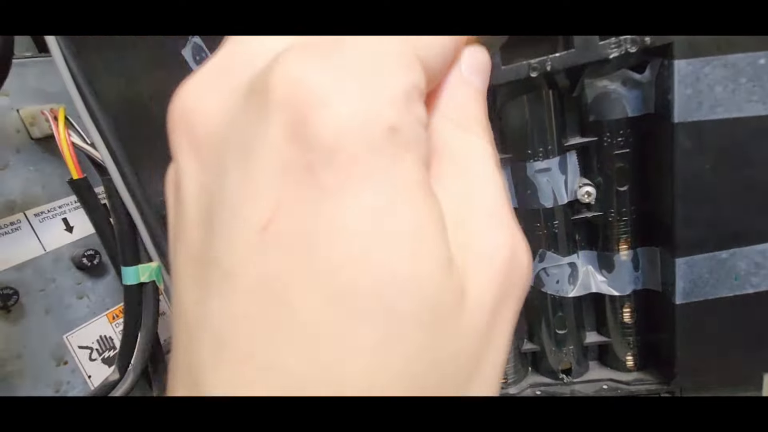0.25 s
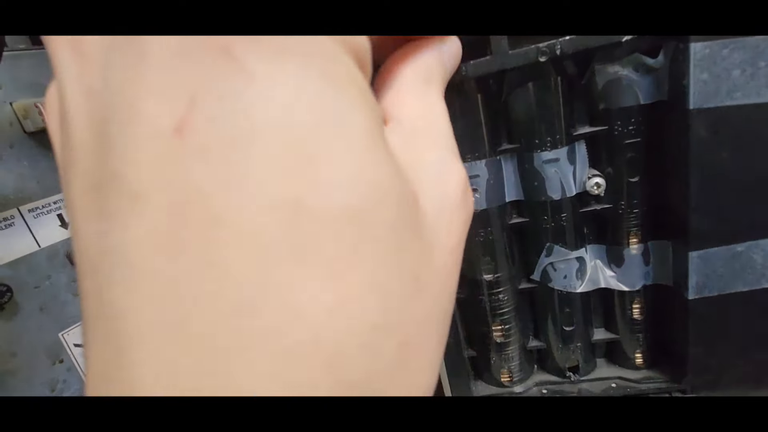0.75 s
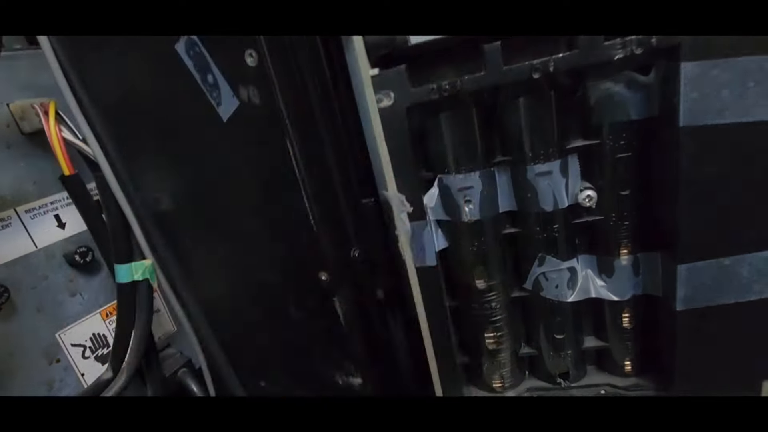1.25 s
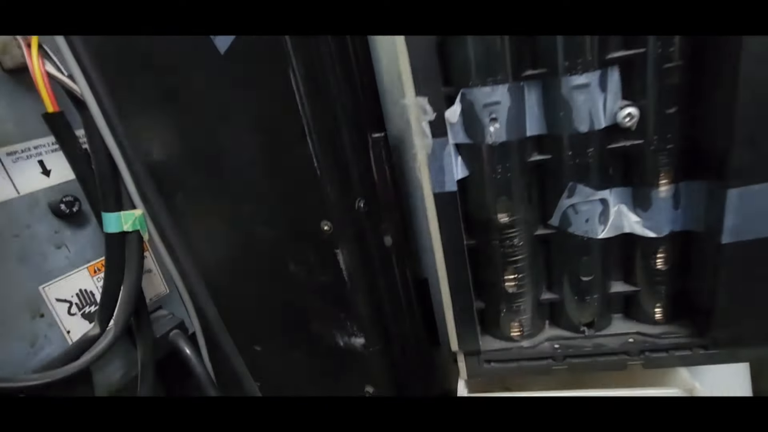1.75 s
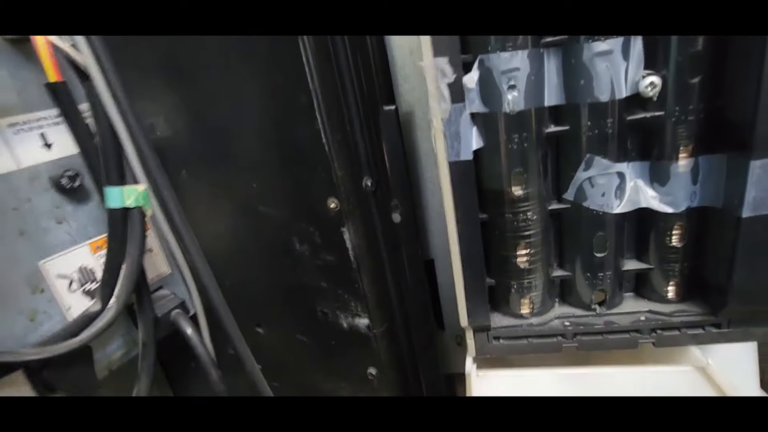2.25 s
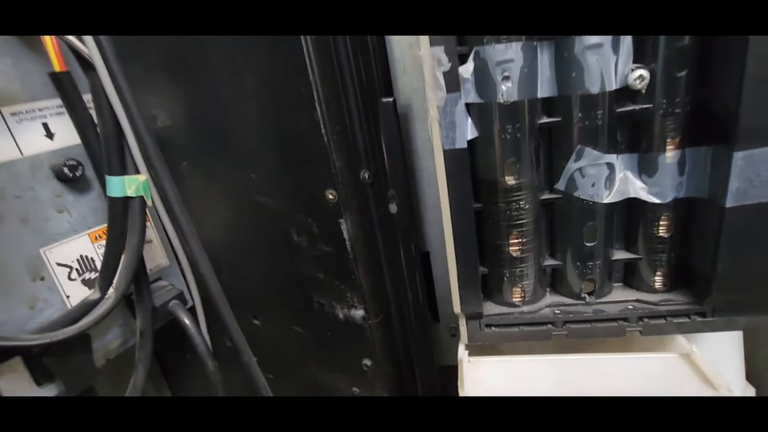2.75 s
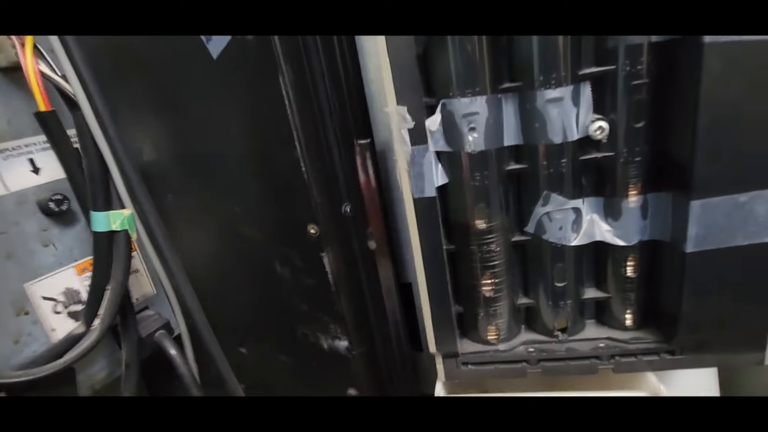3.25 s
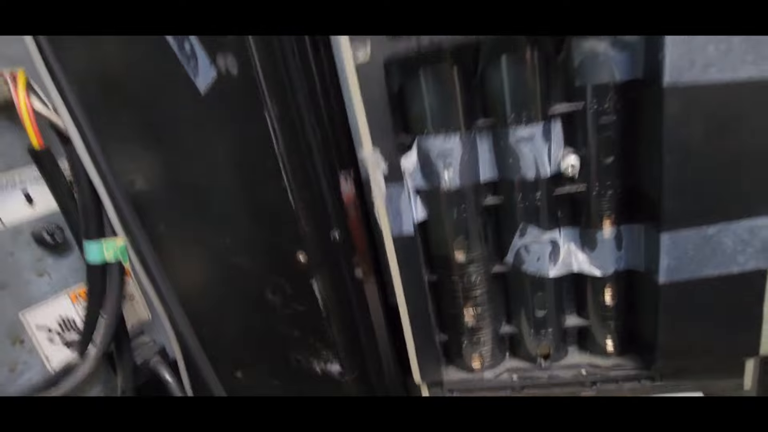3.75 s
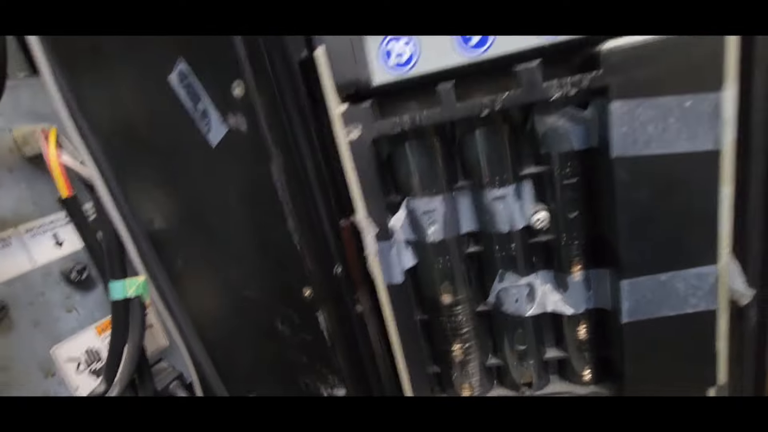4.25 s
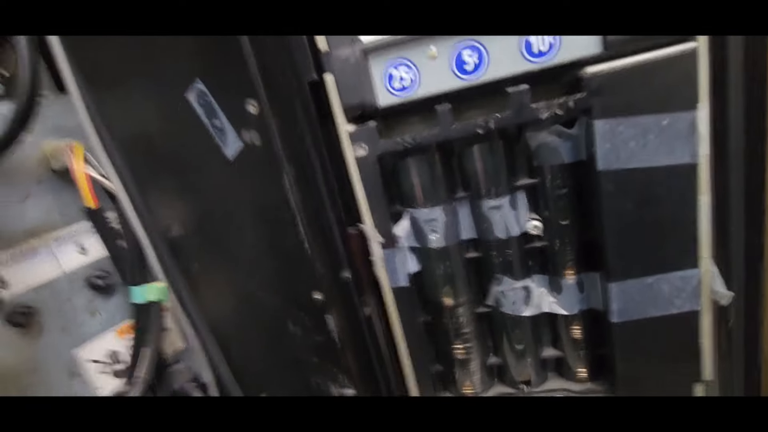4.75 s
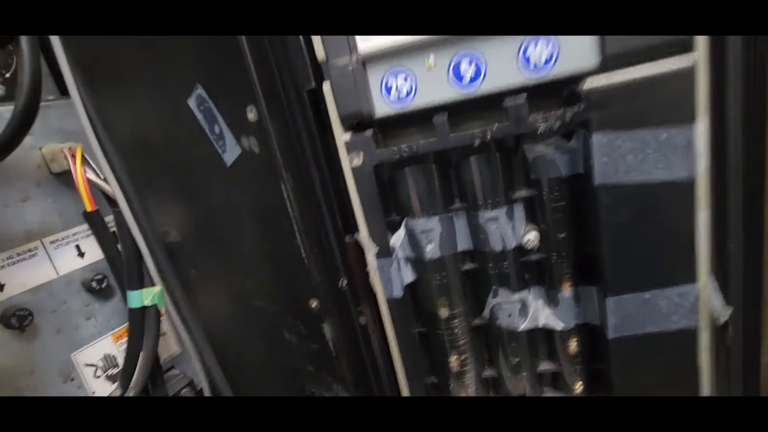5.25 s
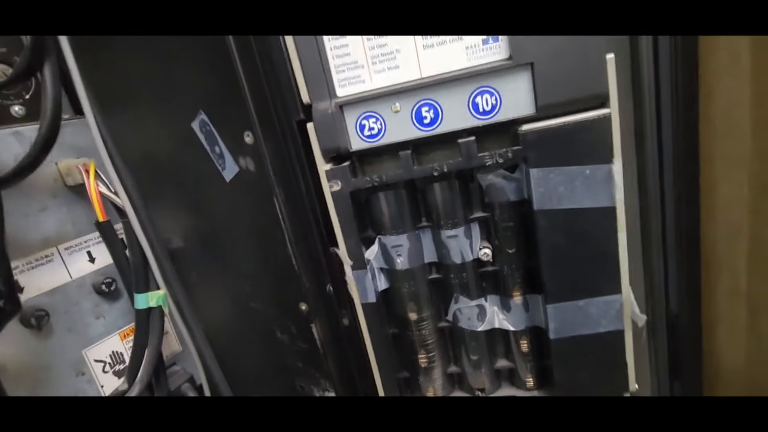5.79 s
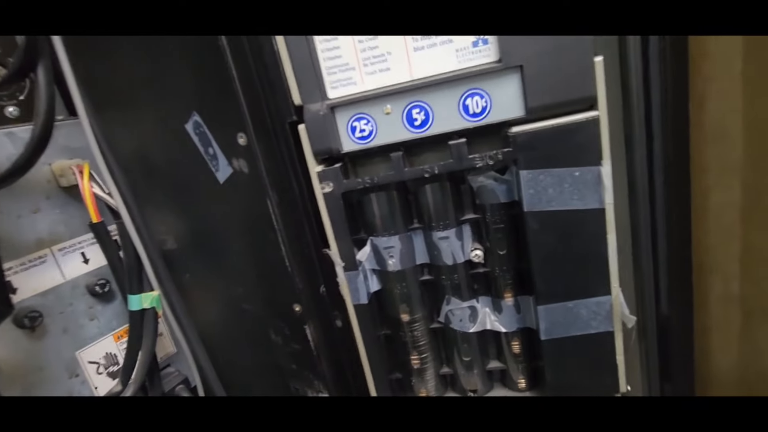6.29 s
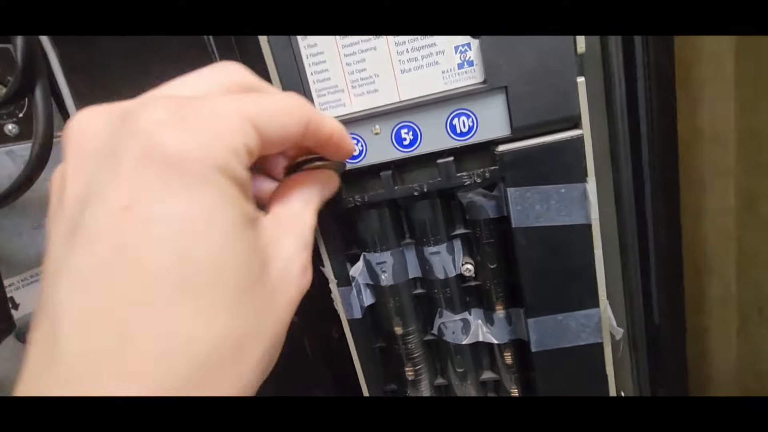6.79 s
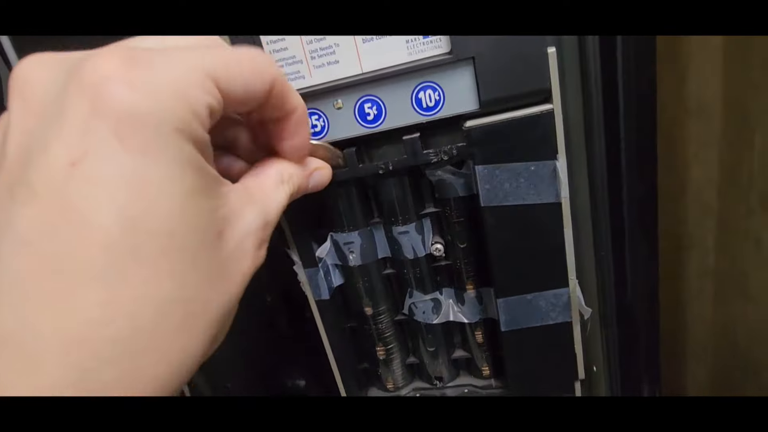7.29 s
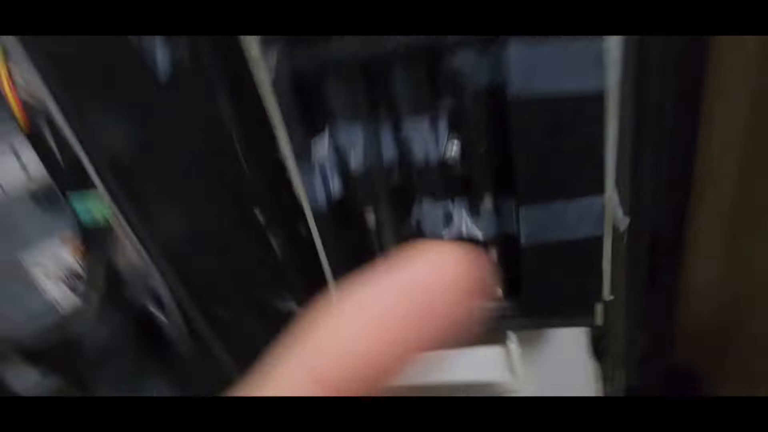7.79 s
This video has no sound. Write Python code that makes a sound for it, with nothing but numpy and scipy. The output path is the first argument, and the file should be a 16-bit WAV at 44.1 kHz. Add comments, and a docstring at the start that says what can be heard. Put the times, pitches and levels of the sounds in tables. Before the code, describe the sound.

Close, bright coin clinks and hollow plastic knocks come in two bursts, with thin palm jingling between them and a low fan hum throughout.

```python
"""Coins clink, knock and slide down the plastic chute of a coin changer for about a second, close by.
From 2.7 s they jingle in a palm and roll between fingers; from 6.8 s they knock and slide in the chute again.
A cooling unit hums throughout: fan blades, airflow in the cabinet and the faint whine of its compressor.
Rings and pings are fading sine tones, the chute adds panel tones, and snaps and rubs are shaped noise."""
import sys
import numpy as np
from scipy import signal
from scipy.fft import rfft, irfft, next_fast_len
from scipy.io import wavfile
from scipy.ndimage import map_coordinates

SR = 44100
rng = np.random.default_rng(int(sys.argv[2]) if len(sys.argv) > 2 else 0)


def wav_out(sig):
    """Save sig, one row per channel (or a flat mono array), as 16-bit PCM at SR to the path in sys.argv[1]."""
    wavfile.write(sys.argv[1], SR, np.round(np.clip(np.atleast_2d(sig).T, -1, 1) * 32767).astype(np.int16))


N = 354123

# A t60 is the time in which a sound fades by 60 dB.
# coin on coin: start_s, ring_db, ring_hz, lower_mode_db, bright_crack_db, dull_crack_db, ping_hz, ring_t60_s
COIN_CONTACTS = [(0.0194, -28, 15500, -45, -34, -41, 4270, 0.1),
                 (0.0344, -33, 15400, -38, -37, -33, 4470, 0.1),
                 (0.072, -13, 15100, -24, -28, -29.5, 3900, 0.12),
                 (0.097, -21, 15100, -18.5, -32, -44, 4620, 0.1),
                 (0.1458, -10, 15100, -31, -17.5, -21.5, 4960, 0.12),
                 (0.1666, -12, 15500, -24.5, -31, -42, 4450, 0.14),
                 (0.2129, -24, 15300, -46, -32, -40, 5130, 0.092),
                 (0.2558, -8, 15000, -31, -23, -24, 5380, 0.12),
                 (0.2674, -5, 15100, -20, -27, -27, 5570, 0.11),
                 (0.2952, -8, 15000, -39, -30, -38, 5820, 0.08),
                 (0.3306, -33, 15100, -41, -35, -45, 4950, 0.1),
                 (0.4036, -41, 15300, -30, -34, -22, 4640, 0.14),
                 (0.439, -7, 15500, -37, -22, -14, 5070, 0.081),
                 (0.4626, -24, 15200, -43, -43, -27, 4560, 0.11),
                 (0.5203, -35, 15300, -39, -47, -46, 4260, 0.17),
                 (0.569, -7, 15200, -32, -18, -20, 5580, 0.082),
                 (0.6138, -14, 15200, -30, -28, -22, 4760, 0.087),
                 (0.6214, -19, 15400, -32, -30, -22.5, 4580, 0.14),
                 (0.6724, -17, 15300, -42, -30, -40, 5630, 0.08),
                 (0.826, -42, 15300, -45, -39, -26, 4600, 0.1),
                 (0.8872, -48, 15300, -49, -41, -29, 4470, 0.1),
                 (0.9138, -37, 15300, -52, -49, -40, 4500, 0.082),
                 (0.9258, -38, 15300, -42, -39, -27, 4600, 0.053),
                 (0.9414, -38, 15500, -40, -28.5, -19.5, 4640, 0.09),
                 (0.9524, -42, 15600, -44, -49, -37, 5020, 0.1),
                 (0.9644, -44, 15300, -45, -44, -37, 5080, 0.1),
                 (1.0346, -33, 15000, -41, -43, -40, 4680, 0.1),
                 (1.056, -11, 15200, -15, -18.5, -23.5, 5200, 0.11),
                 (1.08, -15, 15200, -24, -30, -29, 6200, 0.15),
                 (1.1076, -22, 15300, -31, -29, -38, 5030, 0.08),
                 (2.6908, -9, 15300, -14, -23, -29, 8200, 0.1),
                 (2.713, -8, 14900, -17, -19, -27, 7500, 0.088),
                 (2.7354, -21, 14900, -30, -38, -43, 7750, 0.1),
                 (2.761, -22, 15200, -28, -37, -36, 7500, 0.11),
                 (2.793, -35, 15100, -37, -36, -38, 6600, 0.1),
                 (2.8034, -31, 14900, -45, -34, -37, 7840, 0.092),
                 (2.8195, -26, 15200, -45, -33, -37.5, 7000, 0.11),
                 (2.9392, -47, 15200, -52, -43, -38, 7600, 0.17),
                 (3.027, -30, 15500, -32, -24.5, -22, 7820, 0.093),
                 (3.155, -16, 15100, -30, -19.5, -20, 6900, 0.093),
                 (3.3534, -30, 14700, -41, -35, -44, 7340, 0.1),
                 (3.3628, -26, 15300, -36, -40, -42, 7320, 0.091),
                 (3.385, -27, 15300, -36, -46, -53, 6100, 0.1),
                 (3.406, -21, 15200, -34, -41, -40, 7630, 0.12),
                 (3.4322, -20, 14800, -29, -31, -37, 6230, 0.13),
                 (3.459, -24, 14900, -42, -24.5, -36, 5650, 0.12),
                 (3.769, -28, 15200, -54, -45, -42, 7760, 0.1),
                 (3.795, -50, 14600, -61, -40, -49, 7740, 0.1),
                 (3.9533, -23, 14900, -43, -44, -46, 6500, 0.088),
                 (3.9862, -12, 15000, -31, -29.5, -40, 6060, 0.12),
                 (4.0084, -21, 14900, -41, -47, -48, 7860, 0.1),
                 (4.0536, -12, 14900, -24.5, -34, -44, 7900, 0.18),
                 (4.11, -17, 15000, -34, -29, -43, 7870, 0.1),
                 (4.1284, -23, 14800, -31, -35, -57, 4030, 0.1),
                 (4.1444, -25, 15000, -30, -37, -42, 8140, 0.12),
                 (4.163, -27, 15300, -26, -37, -43, 8110, 0.08),
                 (4.2073, -19, 14900, -21, -35, -37, 7800, 0.11),
                 (4.223, -20, 15300, -10.5, -41, -44, 7800, 0.075),
                 (4.2655, -31, 15300, -24, -37, -41, 7850, 0.092),
                 (4.3892, -37, 15200, -42, -29.5, -30, 5700, 0.063),
                 (4.4323, -40, 15100, -43, -40, -54, 4500, 0.1),
                 (4.4424, -33, 14800, -41, -35, -60, 5770, 0.09),
                 (4.4584, -36, 14700, -38, -42, -60, 4600, 0.1),
                 (4.4933, -32, 15200, -47, -54, -52, 4190, 0.1),
                 (4.5122, -33, 15200, -38, -49, -35.5, 4500, 0.13),
                 (4.548, -33, 15200, -39, -51, -42, 4300, 0.1),
                 (4.6154, -24, 15600, -53, -41, -45, 7200, 0.11),
                 (4.6713, -11, 15100, -21.5, -32, -31, 6650, 0.077),
                 (4.907, -24, 15200, -26, -34, -42, 5680, 0.12),
                 (4.9236, -17, 15200, -27, -32, -38, 5400, 0.11),
                 (4.9374, -35, 15300, -34, -41, -47, 8080, 0.09),
                 (5.0285, -23, 14700, -31, -44, -51, 4200, 0.15),
                 (5.0555, -29, 15300, -36, -45, -40, 5630, 0.1),
                 (5.107, -11, 15100, -18.5, -25.5, -31, 7840, 0.11),
                 (5.1334, -34, 15300, -43, -39, -40.5, 4030, 0.089),
                 (5.2894, -39, 15300, -47, -52, -52, 7090, 0.1),
                 (5.3098, -33, 15200, -45, -54, -54, 7570, 0.11),
                 (5.3652, -32, 14800, -42, -53, -57, 4170, 0.1),
                 (5.4286, -31, 15200, -46, -36, -40, 7800, 0.088),
                 (5.4635, -42, 15200, -47, -50, -45.5, 6410, 0.092),
                 (5.4964, -43, 15500, -43, -41, -47, 4430, 0.08),
                 (5.6476, -11, 15200, -17.5, -24.5, -34.5, 4730, 0.12),
                 (5.6726, -30, 14900, -42, -42, -39, 4770, 0.1),
                 (5.781, -29, 15000, -39, -34, -42.5, 5700, 0.095),
                 (6.268, -48, 14900, -46, -42, -46, 8100, 0.13),
                 (6.2912, -45, 15200, -46, -34, -45, 7900, 0.1),
                 (6.7336, -43, 15600, -56, -42, -57, 7590, 0.087),
                 (6.795, -30, 15800, -44, -31, -39, 6700, 0.11),
                 (6.8128, -23, 15800, -46, -22.5, -42, 4320, 0.082),
                 (6.8622, -30, 15500, -39, -25.5, -20, 5450, 0.088),
                 (6.975, -49, 14600, -53, -34.5, -40, 5710, 0.1),
                 (7.0668, -39, 15700, -51, -35, -42, 7300, 0.1),
                 (7.17, -35, 14600, -46, -25.5, -28, 4650, 0.084),
                 (7.2744, -32, 15100, -46, -37, -34, 4620, 0.083),
                 (7.3038, -18, 14900, -38, -37, -52, 4220, 0.092),
                 (7.3407, -14, 15200, -23, -29, -41, 4980, 0.14),
                 (7.3659, -13, 15200, -31, -24.5, -23, 4550, 0.12),
                 (7.3844, -25, 14800, -36, -30, -15, 4640, 0.091),
                 (7.4275, -34, 14700, -39, -36, -26, 4630, 0.1),
                 (7.4668, -26, 14900, -38, -42, -23, 4650, 0.09),
                 (7.4882, -7, 14700, -31, -20, -18.5, 7770, 0.1),
                 (7.5098, -11, 14700, -26, -27, -24, 5460, 0.1),
                 (7.568, -12, 14800, -40, -30, -33, 7500, 0.1),
                 (7.5759, -6, 15300, -21, -21, -26, 4830, 0.13),
                 (7.5978, -15, 14800, -21.5, -21, -26, 4700, 0.11),
                 (7.646, -8, 14800, -24, -24.5, -37, 4700, 0.11),
                 (7.655, -23, 15300, -29, -35, -31, 8080, 0.1),
                 (7.885, -45, 14900, -43, -48, -38, 4290, 0.1),
                 (7.893, -39, 15900, -46, -44, -29, 4080, 0.06)]
# resonances of the plastic chute: centre_hz, width_hz, level_db
CHUTE_MODES = [(715.6, 620, 0), (1325, 280, 1), (2096, 93, -3), (4830, 93, -8), (5360, 110, -17)]
# colour of the bright part of coin noise: pitch_hz, relative level_db
BRIGHT_COLOUR = [(7000, -22.5), (9000, -6), (12000, -1), (15500, -1), (16200, -25), (17000, -40)]
# colour of the dull part of coin noise: pitch_hz, relative level_db
DULL_COLOUR = [(2200, -1.5), (3500, 6), (4700, 11.5), (6000, 9.5), (8500, -1.5), (11000, -63)]
# how alike left and right are for near sources: pitch_hz, likeness (1 = the same, 0 = unrelated)
NEAR_LIKENESS = [(60, 0.61), (180, 0.91), (550, 0.94), (1650, 0.18), (4970, 0.011), (15000, 0.13)]

PAN_SCATTER_DB = 1  # random left-right spread from one contact to the next
TOP_HZ = 16974  # the sound ends at this pitch


def amp(db):
    """Turn decibels into a plain gain."""
    return 10 ** (np.asarray(db) / 20)


def unit(x):
    """Scale a signal to an rms of 1."""
    return x / np.sqrt(np.mean(x ** 2) + 1e-20)


def along(points, hz):
    """Read a curve of (pitch_hz, value) points on a log pitch axis."""
    f, v = np.transpose(points)
    return np.interp(np.log(hz + 1), np.log(f + 1), v)


def colour_of(points):
    """Make a gain for each pitch from (pitch_hz, level_db) points."""
    return lambda hz: amp(along(points, hz))


def curves(rows):
    """Draw one value per sample for each column after the time."""
    s, *cols = np.transpose(rows)
    return [np.interp(np.arange(N) / SR, s, c) for c in cols]


def wobble(rate):
    """Draw a smooth random curve with this many random points a second."""
    points = rng.standard_normal(int(N * rate / SR) + 4)
    return map_coordinates(points, [np.arange(N) * rate / SR])


def filtered(x, response):
    """Strengthen or weaken each pitch of x by the given response."""
    m = next_fast_len(N + SR // 2)
    return irfft(rfft(x, m) * response(np.fft.rfftfreq(m, 1 / SR)), m)[..., :N]


def modes(table):
    """Sum resonances (centre_hz, width_hz, level_db), every second one with its sign flipped."""
    def response(f):
        total = 0
        for k, (centre, width, db) in enumerate(table):
            peak = 1j * f * width / (centre * centre - f * f + 1j * f * width)
            total = total + (-1) ** k * amp(db) * peak
        return total
    return response


def ports(pair, colour, alike):
    """Colour two unrelated signals and mix them to the likeness of the two microphone ports."""
    def mid_side(hz):
        turn = np.arccos(np.clip(along(alike, hz), -1, 1)) / 2
        return colour(hz) * np.array([np.cos(turn), np.sin(turn)])
    mid, side = filtered(pair, mid_side)
    return np.array([mid + side, mid - side])


def carrier(colour, alike):
    """Make coloured stereo noise with an rms of 1."""
    return unit(ports(rng.standard_normal((2, N)), colour, alike))


def add(bus, s, sound):
    """Mix a short sound into the bus at time s."""
    part = bus[:, round(s * SR):][:, :sound.shape[1]]
    part += sound[:, :part.shape[1]]


def chatter(depth_db):
    """A fast spiky gain of rms 1: tiny bounces that reach both ports alike."""
    return unit(amp(depth_db * (wobble(420) + 0.23 * wobble(130))))


def compressor():
    """A spinning compressor repeats one clatter each turn, which makes a stack of harmonics."""
    # strength of the harmonics: pitch_hz, relative level_db
    whine_colour = [(2300, -37), (2480, 19), (2750, -37), (3800, -8), (4600, -4), (6500, -10), (7100, -3),
                    (8200, -18), (9000, -15), (10500, -5), (11500, -26), (12700, 3.5), (13600, -3),
                    (14400, -36)]
    turns_hz = 58.25
    hz = np.arange(2049) * turns_hz
    sizes = amp(along(whine_colour, hz) + 5 * rng.standard_normal((2, len(hz)))) * (hz < TOP_HZ)
    cycle = unit(irfft(sizes * np.exp(2j * np.pi * rng.random(sizes.shape))))
    # the speed drifts very slightly
    turn = np.cumsum(turns_hz * (1 + 0.000204 * wobble(1.6))) / SR % 1
    whine = [np.interp(turn * len(c), np.arange(len(c)), c, period=len(c)) for c in cycle]
    return amp(-54) * np.array(whine)


def cooler():
    """Fan blades hum as a tone, moving air rushes and booms in the cabinet, and the compressor whines."""
    # how alike left and right are for the cabinet's air: pitch_hz, likeness (below 0 = opposed)
    air_likeness = [(60, .99), (200, .97), (380, 0.73), (700, 0.29), (2200, -0.33), (5000, -0.15),
                    (15000, 0.12)]
    # cabinet resonances: centre_hz, width_hz, level_db
    cabinet_modes = [(50.4, 5.8, -5), (87.4, 16.4, -10.5), (119.9, 5, -3), (134.1, 7.4, -8.5),
                     (270, 52.3, -16.5), (151, 30.7, -19), (30.2, 25, -43)]
    # colour of the airflow: pitch_hz, relative level_db
    air_colour = [(110, -47), (180, -13), (262, -3), (329, -15), (372, -8.5), (449, -20.5), (473, -23),
                  (516, -15.5), (715, -15.5), (907, -17), (1050, -20.5), (1440, -25), (1570, -28),
                  (2150, -21.5), (3600, -41), (4680, -74), (7920, -120)]
    # air resonances: centre_hz, width_hz, level_db over the flow
    air_modes = [(707, 17, 6.5), (1029, 31, 1.5), (1492, 106, 4.5), (534, 73, -1.5)]
    # colour of the high hiss: pitch_hz, relative level_db
    hiss_colour = [(2600, -29), (3200, 2), (6000, -8), (6800, -11), (7800, -1.5), (9300, -16), (10500, -13),
                   (13000, -6), (14500, -28), (15800, -17)]
    fan_hz, fan_db, flow_db = 133, -25, -33.5

    fan_phase = 2 * np.pi * np.cumsum(fan_hz + 0.46 * wobble(3.93)) / SR
    blades = np.sqrt(2) * amp(fan_db + 0.37 * wobble(3.35)) * np.sin(fan_phase)
    boom = amp(-26.5) * carrier(modes(cabinet_modes), air_likeness)

    def airflow(hz):
        return amp(along(air_colour, hz)) * (1 + np.abs(modes(air_modes)(hz)))

    air = amp(flow_db + 0.32 * wobble(10)) * carrier(airflow, air_likeness)
    hiss = amp(-52.5) * carrier(colour_of(hiss_colour), air_likeness)
    return blades + boom + air + hiss + compressor()


def thumps():
    """A padded contact on the cabinet gives one low push that dies quickly, alike at both ports."""
    # soft thumps: start_s, level_db before the fade, pitch_hz
    pushes = [(2.69, -16, 306), (4.604, -15.5, 328), (7.894, -15.5, 383)]
    body = np.zeros((2, N))
    t = np.arange(SR // 10) / SR
    for s, db, hz in pushes:
        fade = amp(db - 60 * t / 0.032) * (1 - np.exp(-t / 0.001))
        add(body, s, np.ones((2, 1)) * fade * np.sin(2 * np.pi * hz * t))
    return body


def ticks():
    """A light touch of a held coin gives a bare click: noise that fades within milliseconds."""
    # dry ticks with no ring: start_s, level_db at the start
    touches = [(1.0066, -33), (1.0291, -29), (2.9048, -38), (2.9182, -30), (4.34, -30), (7.7824, -32),
               (7.7922, -23), (7.8044, -28), (7.8937, -16)]
    # colour of a tick: pitch_hz, relative level_db
    tick_colour = [(500, -12), (1500, 0), (5000, -2), (15000, -10)]
    t60_s = 0.0052
    gate = np.zeros((2, N))
    t = np.arange(SR // 50) / SR
    for s, db in touches:
        add(gate, s, np.ones((2, 1)) * amp(db - 60 * t / t60_s))
    return gate * carrier(colour_of(tick_colour), NEAR_LIKENESS)


def panels(hz):
    """The chute's response: its resonances plus the level between them."""
    # the chute between its peaks: pitch_hz, level_db
    between_peaks = [(300, -12.5), (600, -2), (1600, 7), (2400, 3), (3200, -6.5), (8000, -30)]
    return np.abs(modes(CHUTE_MODES)(hz)) + amp(along(between_peaks, hz))


def strokes(tables):
    """Join separate strokes into level curves, silent in between."""
    def hush(row, step_s):
        return [row[0] + step_s] + [-90] * (len(row) - 1)
    joined = []
    for rows in tables:
        joined += [hush(rows[0], -.035), *rows, hush(rows[-1], .035)]
    return curves(joined)


def settling(column):
    """Loose coins rub on after a contact: a gain that jumps by that column's level and dies away."""
    t60_s = 0.21
    blows, rows = np.zeros(N), np.array(COIN_CONTACTS)
    # powers add up, so levels and fade are doubled here and the root is taken at the end
    blows[np.round(rows[:, 0] * SR).astype(int)] = amp(2 * rows[:, column])
    tail = amp(-2 * 60 * np.arange(SR // 2) / SR / t60_s)
    return np.sqrt(np.abs(signal.fftconvolve(blows, tail)[:N]))


def rubbing(column):
    """Coins rolled between the fingers: a gain that swells, holds and fades."""
    # rubs: start_s, length_s, bright_db, dull_db
    rolls = [(0.054, 0.26, -41.5, -44), (0.916, 0.21, -59, -53), (2.687, .14, -41, -59),
             (3.349, 0.14, -41, -47), (3.96, 0.28, -45, -59), (4.385, 0.19, -49, -53),
             (4.91, 0.25, -58, -59), (5.288, 0.16, -56, -62), (7.306, 0.35, -38, -39.5)]
    edge_s = 0.024  # time to swell or fade
    t = np.arange(N) / SR
    gain = np.zeros(N)
    for row in rolls:
        inside_s = np.minimum(t - row[0], row[0] + row[1] - t)
        gain += amp(row[column]) * np.clip(inside_s / edge_s + .5, 0, 1)
    return gain


def slides():
    """Sliding and rubbing coins chatter: many tiny contacts, too dense to tell apart."""
    # strokes of coins sliding down the chute, each a list of: time_s, level_db
    chute_slides = [
        [(0.0, -41), (0.07, -23.5), (0.19, -29.5), (0.284, -36), (0.658, -45), (0.998, -37), (1.096, -35),
         (1.2, -78)],
        [(6.75, -46), (7.15, -68), (7.336, -31), (7.456, -25), (7.494, -24.5), (7.632, -35), (7.8, -91)],
    ]
    # the coins' shared ring: centre_hz, width_hz, level_db
    shared_ring = [(9300, 550, 6), (15700, 170, -6)]
    settle_bright_db, settle_dull_db = -15, -16  # relative to the cracks

    def bright_pile(hz):
        return amp(along(BRIGHT_COLOUR, hz)) + np.abs(modes(shared_ring)(hz))

    plastic = amp(strokes(chute_slides)[0]) * carrier(panels, NEAR_LIKENESS)
    bright_gain = amp(settle_bright_db) * settling(column=4) + rubbing(column=2)
    dull_gain = amp(settle_dull_db) * settling(column=5) + rubbing(column=3)
    bright = bright_gain * carrier(bright_pile, NEAR_LIKENESS)
    dull = dull_gain * carrier(colour_of(DULL_COLOUR), NEAR_LIKENESS)
    return chatter(depth_db=3.0) * (plastic + bright + dull)


def knocks():
    """Each blow rings the chute's panels at new strengths, one pitch favoured, and shakes loose parts."""
    # coins knocking the chute: start_s, blow level_db, favoured panel pitch_hz, t60_s
    blows = [(0.02, -14.5, 987, 0.055), (0.034, -15, 813, 0.059), (0.052, -17, 1270, 0.059),
             (0.071, -6.5, 770, 0.065), (0.098, -15, 1100, 0.055), (0.136, -10, 1190, 0.071),
             (0.146, -10, 760, 0.076), (0.168, -11.5, 1340, 0.06), (0.228, -13.5, 1080, 0.057),
             (0.25, -9.5, 1240, 0.064), (0.265, -6, 1487, 0.063), (0.288, -19.5, 805, 0.077),
             (0.403, -10, 788, 0.083), (0.441, -13, 767, 0.1), (0.464, -10, 1170, 0.067),
             (0.522, -15, 1550, 0.084), (0.543, -17.5, 1590, 0.052), (0.569, -9, 1338, 0.062),
             (0.584, -12.5, 1570, 0.13), (0.62, -7, 1105, 0.089), (0.672, -22.5, 1495, 0.047),
             (0.807, -22.5, 1094, 0.066), (0.826, -6, 1660, 0.038), (0.839, -5.5, 757, 0.06),
             (0.85, -22, 1000, 0.092), (0.887, -16.5, 810, 0.069), (0.914, -17, 765, 0.055),
             (0.924, -16.5, 780, 0.055), (0.941, -4, 1040, 0.048), (0.953, -11, 1054, 0.082),
             (0.966, -10, 1364, 0.063), (1.058, -10.5, 1620, 0.069), (1.077, -16.5, 1550, 0.075),
             (1.108, -22.5, 1040, 0.055), (2.689, -27, 1090, 0.051), (2.712, -25, 1000, 0.069),
             (4.606, -27, 955, 0.055), (6.796, -5, 816, 0.047), (6.811, -9.5, 1390, 0.063),
             (6.852, -12.5, 825, 0.05), (6.864, -9, 1466, 0.053), (6.958, -24.5, 1290, 0.055),
             (6.977, -23, 760, 0.085), (7.069, -22, 760, 0.055), (7.094, -19.5, 780, 0.051),
             (7.17, -12, 1355, 0.066), (7.246, -21.5, 1350, 0.058), (7.278, -10.5, 1290, 0.043),
             (7.318, -26, 740, 0.055), (7.333, -15, 805, 0.077), (7.352, -13, 810, 0.072),
             (7.367, -7.5, 2240, 0.094), (7.385, -7, 1300, 0.07), (7.4, -8, 1256, 0.088),
             (7.433, -9, 751, 0.057), (7.469, -20, 1080, 0.055), (7.495, -5, 1245, 0.061),
             (7.529, -16, 1130, 0.055), (7.554, -17, 1080, 0.063), (7.576, -11.5, 1590, 0.055),
             (7.585, -11, 1060, 0.08), (7.605, -11, 1063, 0.059), (7.627, -18, 1100, 0.055),
             (7.648, -19, 810, 0.059), (7.792, -21.5, 1510, 0.042), (7.895, -14.5, 760, 0.044)]
    panel_db, shake_db = -12, -5  # panel tones and loose parts, relative to the blow
    panel, shake = np.zeros((2, 2, N))
    t = np.arange(SR // 10) / SR
    for (s, db, hz, t60), chance in zip(blows, rng.standard_normal((len(blows), 4, 4))):
        t60, pan_db = np.clip(t60, .008, .2), PAN_SCATTER_DB * chance[0, 1]
        sides = amp([[db + pan_db / 2], [db - pan_db / 2]])
        fade = sides * amp(-60 * t / t60) * (1 - np.exp(-t / 0.00085))
        tones = [(hz, 7)]
        for (centre, _, level), (shift, strength, *_) in zip(CHUTE_MODES[:3], chance[1:]):
            tones.append((centre * (1 + .09 * shift), level + 4 * strength))
        ring = 0
        for (f, level), row in zip(tones, chance):
            # the higher the tone, the more its phase differs between the ports
            phase = 0.78 * f / 1000 * row[2:, None]
            ring = ring + amp(level) * np.sin(2 * np.pi * f * t + phase)
        add(panel, s, amp(panel_db) * fade * ring)
        add(shake, s, amp(shake_db) * fade)
    return panel + shake * chatter(depth_db=2.5) * carrier(panels, NEAR_LIKENESS)


def clinks():
    """Each contact rings the coins' discs, pings and chatters; the next contact damps the ring."""
    # neighbouring coins: ratio to the ring pitch, level_db
    coin_set = [(1, 0), (.978, -9), (1.016, -9)]
    # where the coins are held: time_s, left_over_right_db
    hand_place = [(0, 1), (1.1, 0), (2.7, -1.5), (3.4, -2.5), (4.1, -0.5), (5.0, -2.5), (6.3, -4), (6.8, 3),
                  (7.3, 2.5), (8, 6.5)]
    lower_hz = 9200  # the coins' lower disc mode, before a small random shift
    ping_over_dull_db, glint_over_bright_db, ping_t60_s = 6, 1.5, 0.031
    bounce_share = 0.53  # how long the bounces last, as a share of the ring's t60

    ring, bright, low, high = np.zeros((4, 2, N))
    t = np.arange(SR // 5) / SR
    count = len(COIN_CONTACTS)
    lives = np.diff([row[0] for row in COIN_CONTACTS], append=N / SR)  # time until the next contact
    hand_db, = curves(hand_place)
    chances, spreads = rng.random((count, 8)), rng.standard_normal(count)
    for row, life, chance, spread in zip(COIN_CONTACTS, lives, chances, spreads):
        s, db, hz, lower_db, bright_db, dull_db, ping_hz, t60 = row
        pan_db = hand_db[round(s * SR)] + PAN_SCATTER_DB * spread
        sides = amp([[pan_db / 2], [-pan_db / 2]]) * (1 - np.exp(-t / 0.00068))
        damped_db = np.clip(60 * (t - life) / .03, 0, 14)
        t60 = np.clip(t60, .01, .6)
        lag = np.array([[0], [.15 + .2 * chance[6]]])  # cycles of offset between the ports

        fade = amp(-60 * t / t60 - damped_db) * (1 - np.exp(-t / 0.0004))
        fade = fade * np.cos(np.pi / 2 * t / t[-1])  # end in silence
        tones = [(hz * ratio, db + level) for ratio, level in coin_set]
        tones.append((lower_hz * (.96 + 0.058 * chance[5]), lower_db))
        discs = 0
        for k, (f, level) in enumerate(tones):
            cycles = f * t + chance[k] + (-1) ** k * lag
            discs = discs + amp(level) * np.sin(2 * np.pi * cycles)

        ping = amp(dull_db + ping_over_dull_db) * np.sin(2 * np.pi * (ping_hz * t + chance[4] + lag))
        # a short bright ping at a random pitch between 10 and 13.2 kHz
        glint_hz = 10000 + 3200 * chance[7]
        glint_wave = np.sin(2 * np.pi * (glint_hz * t + chance[4] - lag))
        ping += amp(bright_db + glint_over_bright_db) * glint_wave
        add(ring, s, sides * (fade * discs + amp(-60 * t / ping_t60_s) * ping))

        snap = 1.85 * amp(-60 * t / 0.0029)
        bounces = 1.53 * amp(-60 * t / (bounce_share * t60))
        crack = sides * (snap + bounces)
        add(bright, s, amp(bright_db) * crack)
        # a high ping goes with a thin crack
        share = np.pi / 2 * np.clip((ping_hz - 4500) / 3000, .1, .9)
        add(low, s, np.cos(share) * amp(dull_db) * crack)
        add(high, s, np.sin(share) * amp(dull_db) * crack)

    # touching coins flutter, partly alike on both sides
    ring *= unit(amp(3.9 * wobble(110) + 1.7 * np.array([wobble(400), wobble(400)])))
    cracks = bright * carrier(colour_of(BRIGHT_COLOUR), NEAR_LIKENESS)
    cracks += low * carrier(colour_of(DULL_COLOUR), NEAR_LIKENESS)
    # the thin crack has the dull colour moved up in pitch
    cracks += high * carrier(lambda hz: amp(along(DULL_COLOUR, hz / 1.64)), NEAR_LIKENESS)
    return ring + chatter(depth_db=3.0) * cracks


def scene():
    """Add the cooling unit and all the sounds of the coins."""
    return cooler() + thumps() + ticks() + slides() + knocks() + clinks()


def record(dry):
    """Loud peaks are softly limited; the top is rolled off near 15.9 kHz and ends at 17 kHz."""
    roll_hz = 15850  # middle of the 22 dB drop
    level = dry / (1 + np.abs(dry / 1.05) ** 6) ** (1 / 6)

    def top_rolloff(hz):
        return amp(-22 / (1 + np.exp((roll_hz - hz) / 60))) * (hz < TOP_HZ)

    return filtered(level, top_rolloff)


dry = scene()
out = record(dry)
wav_out(out)
```